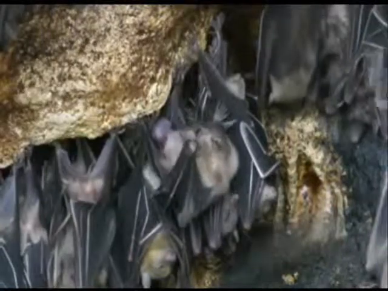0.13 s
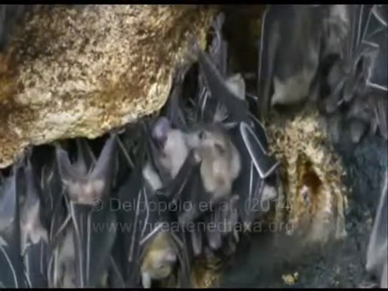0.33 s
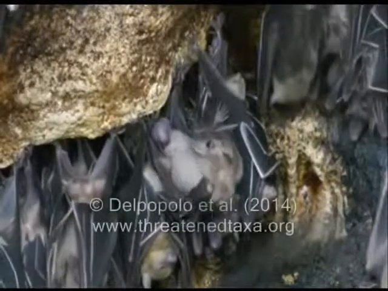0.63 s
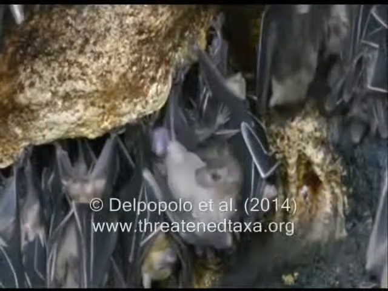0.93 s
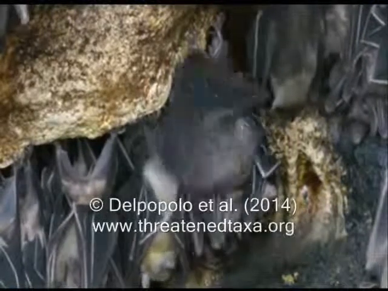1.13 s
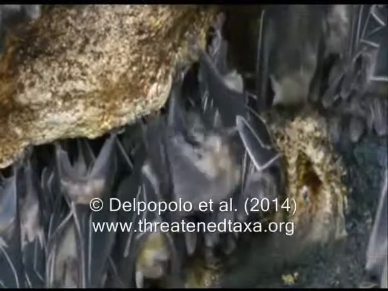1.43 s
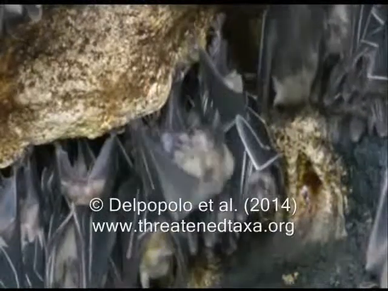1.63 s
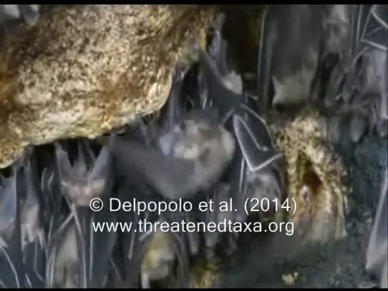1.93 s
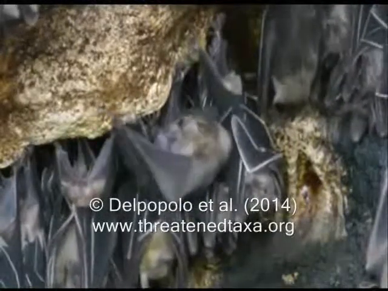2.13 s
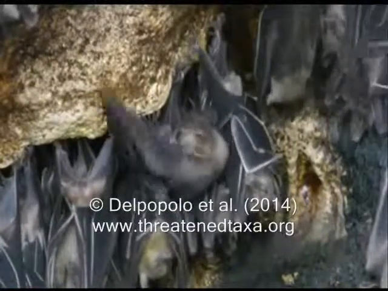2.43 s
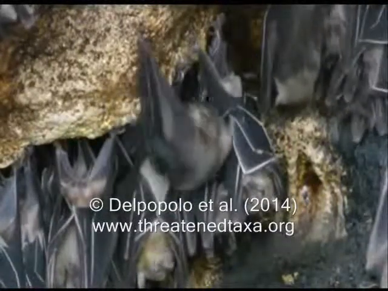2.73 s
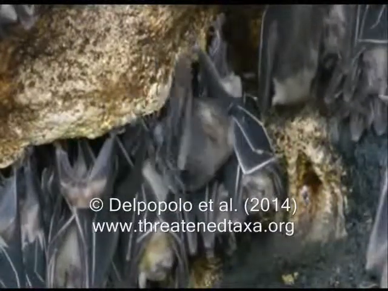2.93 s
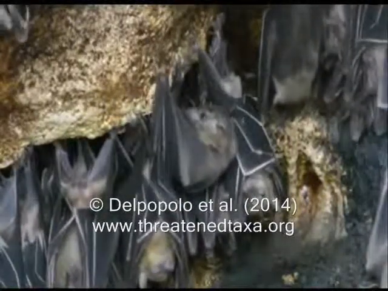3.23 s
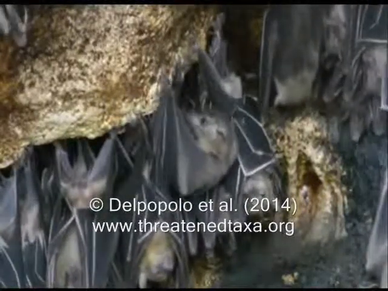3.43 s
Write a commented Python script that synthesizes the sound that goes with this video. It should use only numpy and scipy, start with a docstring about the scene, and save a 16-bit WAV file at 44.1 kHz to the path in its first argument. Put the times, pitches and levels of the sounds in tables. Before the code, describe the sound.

Fruit bats in a cave roost chatter without pause for about 3.5 seconds. Very short, piercing squeaks and rasping screeches overlap nearby, leaning right, over dense shrill chatter, tiny clicks and a bright hiss of far voices. Lower squawks come around 1.6 and 2.2 seconds; squeaks crowd together near 2.7-3.2. Rock walls add a brief tail; faint low rumble, hollow noise and hum lie beneath.

```python
"""Fruit bat colony in a cave

Near bats give arched squeaks (gliding sines), rasping screeches (pulsed noise in a broad resonance) and
a few lower squawks (harmonics shaped by a throat). Many short squeaks make the chatter behind them, with
tiny clicks; the far voices are a hiss of shaped noise, stronger on the right. Decaying noise gives the
rock walls their tail. Below lie a low rumble and hollow background noise, probably of the camera
(shaped noise), and a faint hum.
"""
import sys
import numpy as np
from scipy import signal
from scipy.fft import rfft, irfft, next_fast_len
from scipy.io import wavfile

SR = 44100
rng = np.random.default_rng(int(sys.argv[2]) if len(sys.argv) > 2 else 0)


def unload_wav(signal):
    """Save mono or channel-first audio to the path in sys.argv[1] as 16-bit WAV at rate SR, clipped to [-1, 1]."""
    wavfile.write(
        sys.argv[1],
        SR,
        np.round(np.clip(np.atleast_2d(signal).T, -1, 1) * 32767).astype(np.int16),
    )


N = 157437  # length [samples]


def undb(db):
    """Amplitude ratio: decibels to linear gain."""
    return 10 ** (np.asarray(db) / 20)


def level(x, db=0):
    """Effective value: scale a signal to an rms level in dB."""
    return x * undb(db) / np.sqrt(np.mean(x ** 2) + 1e-18)


def lookup(points, hz):
    """Logarithmic pitch scale: interpolate (Hz, value) points over log frequency."""
    f, v = np.array(points, float).T
    return np.interp(np.log(np.maximum(hz, 1)), np.log(f), v)


def follow(points):
    """Time contour: straight lines through (s, value) points, one value per sample."""
    return np.interp(np.arange(N) / SR, *np.array(points).T)


def colour(x, points):
    """Linear filtering: multiply the spectrum by a (Hz, dB) response."""
    size = next_fast_len(N)
    gain = undb(lookup(points, np.fft.rfftfreq(size, 1 / SR)))
    return irfft(rfft(x, size) * gain, size)[..., :N]


def walk(rate, size):
    """Random modulation: straight lines between normal draws, `rate` draws a second."""
    return np.interp(np.arange(size) * rate / SR, np.arange(512), rng.standard_normal(512))


def pan(db):
    """Interaural level difference: left and right gains, left over right in dB."""
    return undb(np.array([[db], [-db]]) / 2)


def add(out, start, x, pan_db):
    """Superposition: add a call at its time [s] and direction [dB]."""
    i = int(max(start, 0) * SR)
    x = x[:max(N - i, 0)]
    out[:, i:i + len(x)] += x * pan(pan_db)


ATTACK_SHARE, RELEASE_SHARE = 0.16, 0.25  # of a call's length


def envelope(u):
    """Amplitude envelope: sine-shaped attack, hold and release over a call's progress 0-1."""
    ramp = np.minimum(u / ATTACK_SHARE, (1 - u) / RELEASE_SHARE)
    return np.sin(np.pi / 2 * np.clip(ramp, 0, 1))


JITTER, JITTER_HZ = .06, 1500  # pitch fraction at roughness 1, random draws a second
FLUTTER_HZ, FLUTTER_DEPTH = 300, .4  # mean rate, amplitude fraction


def voice(length, hz, top, droop, rough):
    """Frequency and amplitude modulation: phase of an arched, jittering pitch; fluttering loudness."""
    size = int(length * SR)
    u = np.arange(size) / size
    arch = hz * 2 ** (-droop * (u - top) ** 2)
    pitch = arch * (1 + JITTER * rough * walk(JITTER_HZ, size))
    flutter_hz = FLUTTER_HZ * (1 + 0.302 * walk(196.5, size))
    flutter = 1 + FLUTTER_DEPTH * np.sin(2 * np.pi * np.cumsum(flutter_hz) / SR)
    return 2 * np.pi * np.cumsum(pitch) / SR, envelope(u) * flutter


def squeak(length, hz, db, top, droop, rough):
    """Pure tone: a single sine with the moving pitch and loudness of one call."""
    phase, loud = voice(length, hz, top, droop, rough)
    return np.sqrt(2) * undb(db) * loud * np.sin(phase)


RASP_PULSE_HZ, RASP_DEPTH = 376, .6  # mean puff rate, exponent of the pulsing


def rasp(length, hz, width, db, order=3):
    """Pulsed turbulence and resonance: uneven puffs of noise through a broad throat band."""
    size = int(length * SR)
    pulse_hz = RASP_PULSE_HZ * (1 + 0.32 * walk(242, size))
    cycle = 2 * np.pi * np.cumsum(pulse_hz) / SR
    puffs = rng.standard_normal(size) * np.exp(RASP_DEPTH * np.sin(cycle))
    edges = np.clip([hz - width / 2, hz + width / 2], 100, SR / 2 - 100)
    throat = signal.butter(order, edges, 'bandpass', fs=SR, output='sos')
    return envelope(np.arange(size) / size) * level(signal.sosfilt(throat, puffs), db)


# Response of the squawk's throat: (frequency [Hz], gain [dB])
THROAT_RESPONSE = [(700, -25), (1100, -16), (2200, -26), (3300, -7.5), (4400, 0), (5500, -6), (6700, 0),
                   (9000, -28), (12000, -24)]


def squawk(length, hz, db, top, droop, rough):
    """Source and filter: 13 harmonics of a lower call, weighted by the throat."""
    phase, loud = voice(length, hz, top, droop, rough)
    tone = 0
    for k in range(1, 14):
        tone = tone + undb(lookup(THROAT_RESPONSE, k * hz)) * np.sin(k * phase)
    return loud * level(tone, db)


# Levels in these call tables are relative, before envelope and distance; droop is one length from the top.
# Near squeaks: (start [s], length [s], top pitch [Hz], level [dB], place of top [0-1],
# droop [octaves], roughness [0-1, more when very rough])
NEAR_SQUEAKS = [(0.016, 0.027, 9100, -27, .5, .4, .4), (0.094, 0.037, 9400, -25, 0.9, 0.24, .3),
                (.20, .03, 9500, -25, 0.6, .5, .5), (.285, 0.037, 6600, -22, .4, .15, 0.04),
                (0.335, 0.043, 8600, -21, .5, .4, .6), (.36, .028, 7900, -24, 0.35, 0.4, 0.3),
                (.415, 0.025, 8800, -26, .3, .3, 0.3), (.452, 0.052, 3330, -29.5, .4, 0.54, 1.1),
                (0.579, 0.042, 9400, -25, .5, .4, 0.45), (.68, .036, 8650, -23, .4, 0.17, .25),
                (0.739, .034, 8000, -20, .6, .25, 0.3), (.768, 0.022, 7700, -22, .4, 0.58, 0.6),
                (0.86, 0.025, 5750, -22, 0.45, .4, .4), (.965, .028, 7800, -20.5, .7, 0.53, 0.7),
                (.975, .055, 10100, -24, .4, .45, 0.48), (1.003, 0.032, 6300, -23, .5, 0.27, .2),
                (1.095, 0.056, 9100, -20, 0.7, 0.27, 0.7), (1.19, .03, 8400, -22, 0.63, 0.33, 0.65),
                (1.515, 0.024, 8400, -26, .5, 0.25, 0.2), (1.544, 0.084, 10600, -25, 0.25, .4, .8),
                (1.573, 0.015, 5350, -21, .5, 0.2, .3), (1.783, 0.042, 11000, -21.5, .33, 0.65, 0.4),
                (1.814, 0.024, 9650, -21.5, 0.46, 0.26, 0.4), (1.886, 0.015, 6250, -31, .5, .3, .3),
                (1.931, 0.022, 10350, -23, .5, 0.33, 0.54), (1.961, 0.053, 8020, -20.5, 0.36, .4, 0.28),
                (2.003, 0.031, 10900, -24, 0.34, 0.36, 0.3), (2.009, 0.034, 5750, -21.5, 0.44, 0.27, 0.1),
                (2.043, 0.033, 9400, -25, 0.54, .4, 0.4), (2.116, .052, 9800, -20, .55, .3, 0.7),
                (2.142, 0.033, 5850, -23.5, 0.38, 0.26, 0.4), (2.358, 0.03, 8700, -20.5, .35, 0.35, 0.47),
                (2.49, 0.039, 8650, -23, 0.3, 0.13, .3), (2.574, .02, 10400, -26, .5, 0.46, .7),
                (2.604, 0.059, 8200, -23, 0.95, 0.28, 0.36), (2.699, .031, 7700, -18, .52, .55, 0.3),
                (2.761, 0.038, 7150, -21.5, 0.63, 0.34, 0.54), (2.783, .042, 7600, -21, 0.4, 0.28, 0.4),
                (2.816, .05, 7600, -24, .6, 0.34, 0.4), (2.917, .026, 9950, -25, 0.25, .2, .25),
                (2.944, 0.016, 7500, -19, 0.46, .4, .3), (2.96, 0.041, 9100, -19.5, 0.75, .35, 0.48),
                (3.005, 0.028, 8200, -22.5, 0.54, .4, 0.4), (3.108, 0.067, 8300, -21.5, 0.55, 0.27, 0.5),
                (3.158, .035, 8300, -20.5, .8, 0.56, 0.74), (3.108, 0.038, 3450, -38, .5, 0.32, .3),
                (3.279, 0.0394, 10800, -18.5, .48, 0.577, 0.16), (3.333, 0.035, 6600, -28, 0.04, .15, 0.2),
                (3.41, .03, 10400, -26, .6, 0.32, 0.5), (3.442, 0.062, 7150, -19.5, 0.36, .15, 0.4),
                (3.435, .04, 6200, -26.5, 0.73, 0.19, 0.2), (3.524, .06, 4050, -29, 0.54, 0.18, 0.3)]
# A faint low falling cry: columns as for the squeaks
FALLING_CRY = [(2.27, 0.087, 930, -40, 0.09, 0.315, 0.25)]
# Rasping screeches: (start [s], length [s], centre [Hz], width [Hz], level [dB])
SCREECHES = [(.005, 0.058, 5500, 2500, -30), (.03, 0.094, 10500, 3500, -27), (.27, .075, 5530, 2210, -22),
             (0.722, .08, 7600, 2800, -32), (0.953, 0.056, 7500, 4500, -29),
             (1.082, 0.043, 6440, 2500, -23), (1.22, 0.07, 11400, 2500, -29),
             (1.436, 0.072, 7100, 3000, -20), (1.56, 0.12, 6000, 2200, -23.5),
             (1.767, 0.063, 5640, 2010, -23), (1.925, 0.081, 6500, 3500, -21),
             (2.106, 0.049, 7500, 3000, -23), (2.186, 0.097, 10200, 2500, -23.5),
             (2.241, 0.081, 5950, 2600, -21.5), (2.361, .04, 6050, 2500, -23.5),
             (2.415, 0.17, 6300, 4000, -29.5), (2.596, 0.051, 6200, 2510, -19),
             (2.645, 0.045, 6200, 2800, -24.5), (2.779, 0.036, 5540, 2400, -23),
             (2.887, 0.055, 5960, 2600, -21.5), (3.207, 0.081, 8950, 4500, -28),
             (3.29, 0.059, 4670, 1200, -25.5), (3.315, 0.05, 8100, 3000, -26),
             (3.436, 0.038, 7050, 5030, -22)]
# Lower squawks: columns as for the squeaks
LOW_SQUAWKS = [(1.64, 0.0763, 1102, -22, .57, .55, 0.24), (2.188, 0.12, 1090, -28.5, 0.03, 0.4, 0.23),
               (2.241, 0.0675, 996, -32, .7, 0.247, .4)]
NEAR_DB = -3.5  # gain on all near calls
NEAR_PAN_DB, PAN_SPREAD_DB = -5, -2.5  # left over right: mean, random spread


def near_bats():
    """Superposition of nearby sources: the closest callers, mostly to the right."""
    out = np.zeros((2, N))
    calls = ((squawk, LOW_SQUAWKS), (rasp, SCREECHES), (squeak, NEAR_SQUEAKS + FALLING_CRY))
    for call, table in calls:
        for start, *row in table:
            add(out, start, call(*row), NEAR_PAN_DB + PAN_SPREAD_DB * rng.standard_normal())
    return out * undb(NEAR_DB)


# Colour of the massed voices, also used for the clicks and far hiss: (frequency [Hz], gain [dB])
COLONY_COLOUR = [(1200, -24.5), (2200, -18.5), (3000, -13), (3600, -12.5), (4200, -8.5), (5000, -2),
                 (6000, -1.6), (7200, -1), (8500, -1.5), (10000, -4), (11300, -8.5), (12600, -12)]
CHATTER_DB, CHATTER_SPREAD_DB = -25, 3  # rms before bustle and cave, half-range between calls
CHATTER_LENGTH_S, CHATTER_DROOP_OCT = .04, .4  # mean length, droop one length from the top


def chatter(count=1000):
    """Statistical superposition: overlapping random squeaks from the rest of the roost."""
    out = np.zeros((2, N))
    for k, (when, long, high, top, rough, loud, side) in enumerate(rng.random((count, 7))):
        length = CHATTER_LENGTH_S * (.5 + long)
        db = CHATTER_SPREAD_DB * (2 * loud - 1)
        call = squeak(length, 3600 + 9200 * high, db, top, CHATTER_DROOP_OCT, .15 + 0.58 * rough)
        add(out, (k + when) / count * N / SR, call, NEAR_PAN_DB + 6 * (2 * side - 1))
    return level(colour(out, COLONY_COLOUR), CHATTER_DB)


CLICK_DB, CLICK_SPREAD_DB = -40, 4.5  # rms before the cave, half-range between clicks


def clicks(count=120):
    """Impulse response: tiny tongue clicks, single-sample impulses coloured like the voices."""
    out = np.zeros((2, N))
    for when, loud, side in rng.random((count, 3)):
        impulse = undb([CLICK_SPREAD_DB * (2 * loud - 1)])
        add(out, when * N / SR, impulse, NEAR_PAN_DB + 6 * (2 * side - 1))
    return level(colour(out, COLONY_COLOUR), CLICK_DB)


CAVE_T60_S, CAVE_DB = 0.54, -5  # time to fall 60 dB, tail gain


def cave(x):
    """Reverberation: convolve with exponentially decaying noise, different in each ear."""
    t = np.arange(SR) / SR
    decay = undb(-60 * t / CAVE_T60_S) * (t > .004)  # silent for the first 4 ms
    tail = rng.standard_normal((2, SR)) * decay
    tail = tail / np.sqrt(np.sum(tail ** 2) / 2)
    return x + undb(CAVE_DB) * signal.fftconvolve(x, tail, axes=1)[:, :N]


# Left-right likeness of the diffuse sound, limited to 0-1 in use: (frequency [Hz], likeness [0-1])
EAR_LIKENESS = [(60, .82), (180, 0.83), (330, 0.13), (600, 0.72), (1300, 0.86), (2800, 0.72), (6000, 0.85),
                (12000, 4.4)]
# Balance of the diffuse sound: (frequency [Hz], left over right [dB])
EAR_BALANCE = [(60, 1.5), (200, 2), (360, -2), (650, -2.5), (1200, -1.5), (2200, -0.5), (3900, -3.5),
               (6200, -11), (9000, -3.5), (12500, -6)]
SWELL_DB = 1.08  # scale of the random swell shared by all bands


def wash(points, db, flicker_db):
    """Diffuse field: noise in third-octave bands that swell together and flicker alone."""
    size = next_fast_len(N)
    f = np.fft.rfftfreq(size, 1 / SR)
    mid, side = rfft(rng.standard_normal((2, size)))
    alike = np.clip(lookup(EAR_LIKENESS, f), 0, 1)
    lean = np.array([[1], [-1]])  # left, right
    ears = mid * np.sqrt(1 + alike) + lean * side * np.sqrt(1 - alike)
    both = ears * undb(lookup(points, f) + lean * lookup(EAR_BALANCE, f) / 2)
    band = 3 * np.log2(np.maximum(f, 400) / 400)  # all below 400 Hz is band 0
    swell = SWELL_DB * walk(12, N)
    out = 0
    for k in range(17):
        share = np.maximum(1 - abs(band - k), 0)  # triangular overlap
        out = out + irfft(both * share, size)[:, :N] * undb(swell + flicker_db * walk(40, N))
    return level(out, db)


def far_colony():
    """Merging of many sources: the far voices become a hiss of shaped noise."""
    return wash(COLONY_COLOUR, db=-21.5, flicker_db=0.77)


# Level of the chatter and far colony: (time [s], level [dB])
BUSTLE_LEVEL = [(0, .7), (.3, 0.1), (.4, -0.1), (.5, 1.2), (1.02, -0.6), (1.27, -0.9), (1.34, -1.6),
                (1.6, 0.9), (1.76, -1.5), (1.88, -0.7), (1.95, 1), (2.08, -1.6), (2.45, .5), (2.93, 0.1),
                (3.05, -0.5), (3.27, 1.2), (3.38, -2.5), (3.5, -0.1)]


def bustle():
    """Slow amplitude modulation: the common gain of the chatter and far colony."""
    return undb(follow(BUSTLE_LEVEL))


# Colour of the background noise: (frequency [Hz], gain [dB])
NOISE_COLOUR = [(25, -14), (45, -7), (60, -1), (85, 1.5), (120, -3), (185, -3), (260, -7.5), (350, -8.5),
                (500, -6), (680, 0), (830, 2), (1000, -1), (1200, -5.5), (1800, -6), (3000, -11.5),
                (6000, -17)]


def background_noise():
    """Broadband noise with spectral peaks: a low rumble and a hollow noise, probably of the camera."""
    return wash(NOISE_COLOUR, db=-38, flicker_db=2)


# Swell of the hum, relative to its overall rms: (time [s], level [dB])
HUM_CONTOUR = [(0, -4), (.8, -17), (.95, 5), (1.25, 7), (1.4, -6), (2.9, -4), (3.1, 6), (3.55, 2)]
HUM_HZ, HUM_DB, HUM_WAVER_DB = 183, -58.5, -1  # mean pitch, overall rms, scale of random waver


def hum():
    """Modulated pure tone: a faint low hum that wavers and swells twice."""
    phase = 2 * np.pi * np.cumsum(HUM_HZ * (1 + 0.021 * walk(16, N))) / SR
    loud = undb(follow(HUM_CONTOUR) + HUM_WAVER_DB * walk(10, N))
    return level(np.sin(phase) * loud, HUM_DB)


def scene():
    """Superposition: reverberant calls over the far colony, background noise and hum."""
    activity = bustle()
    calls = cave(near_bats() + activity * chatter() + clicks())
    return calls + activity * far_colony() + background_noise() + hum()


TOP_HZ = 12500  # upper edge of the recorder's passband


def record(dry):
    """Band limiting: the recorder cuts the top with a steep elliptic low-pass."""
    # 0.2 dB passband ripple, 90 dB stopband
    lowpass = signal.ellip(12, .2, 90, TOP_HZ, fs=SR, output='sos')
    return signal.sosfilt(lowpass, dry)


dry = scene()
out = record(dry)
unload_wav(out)
```